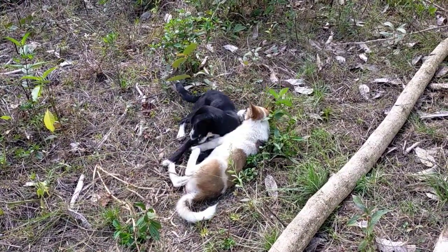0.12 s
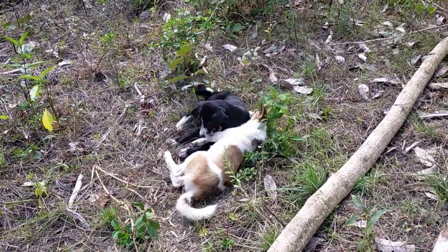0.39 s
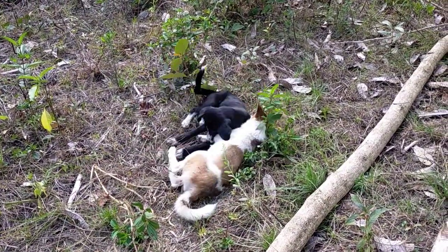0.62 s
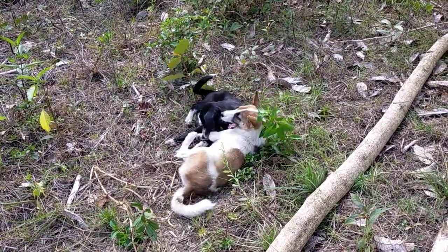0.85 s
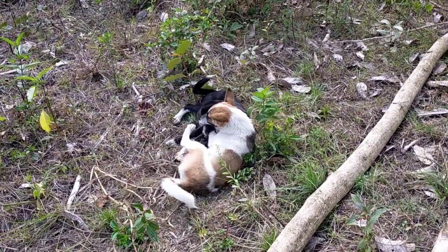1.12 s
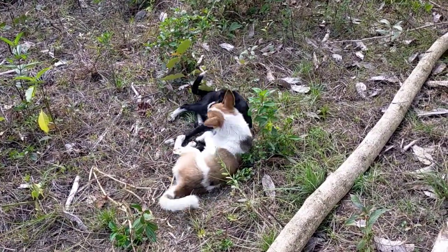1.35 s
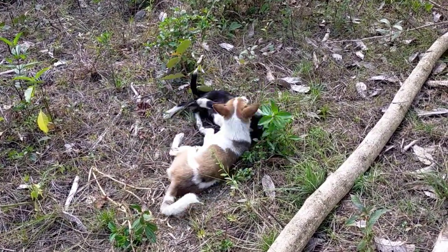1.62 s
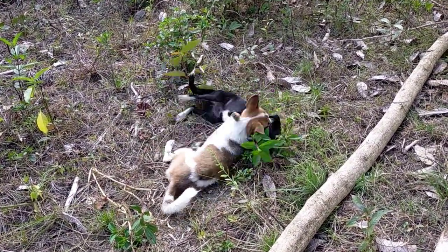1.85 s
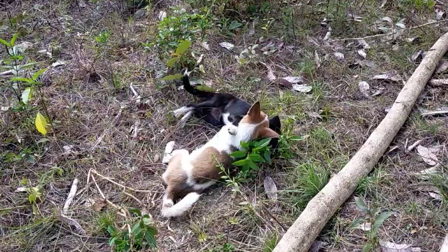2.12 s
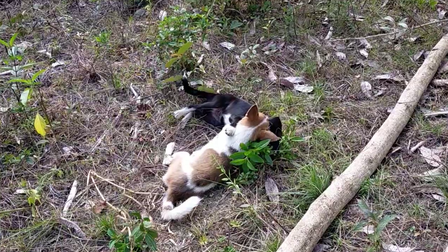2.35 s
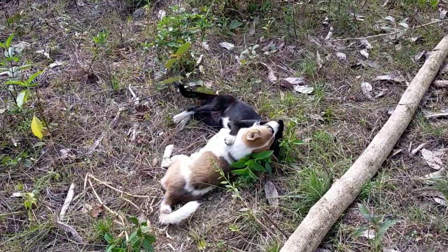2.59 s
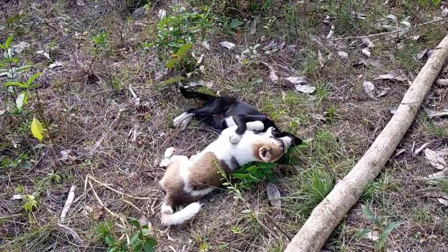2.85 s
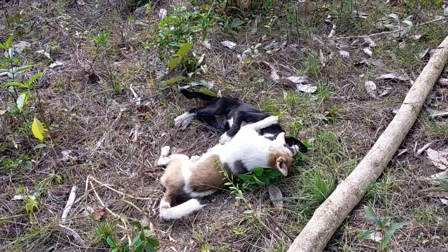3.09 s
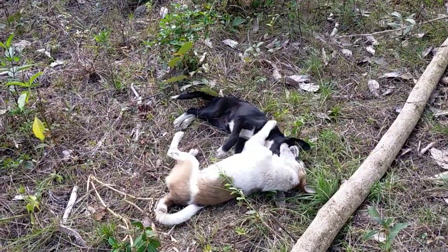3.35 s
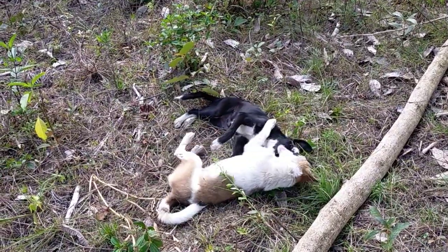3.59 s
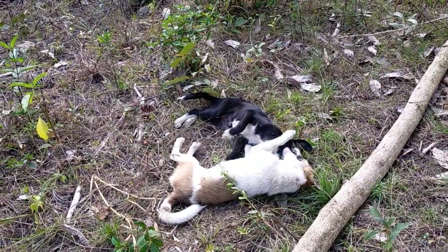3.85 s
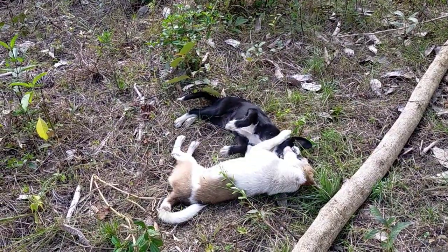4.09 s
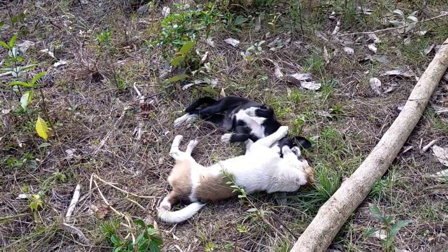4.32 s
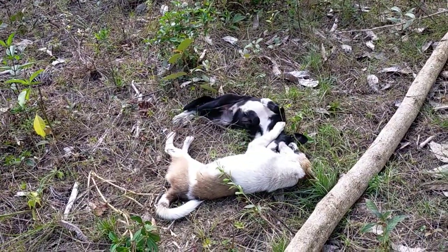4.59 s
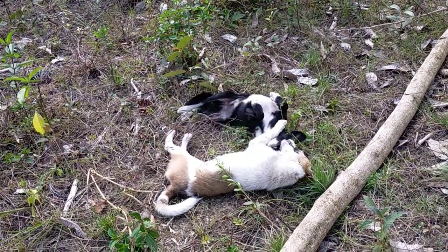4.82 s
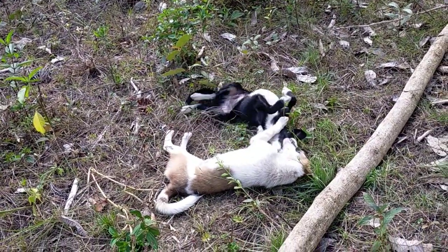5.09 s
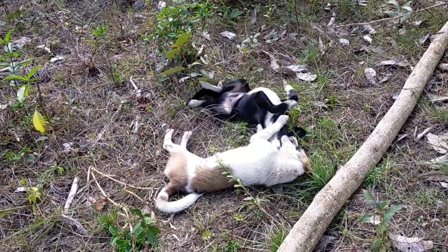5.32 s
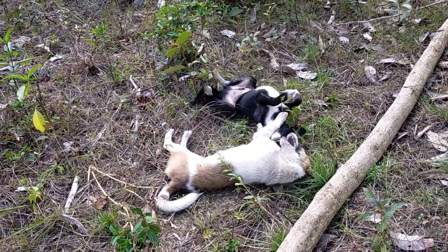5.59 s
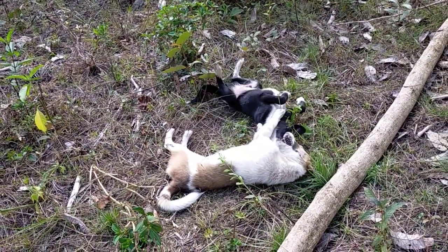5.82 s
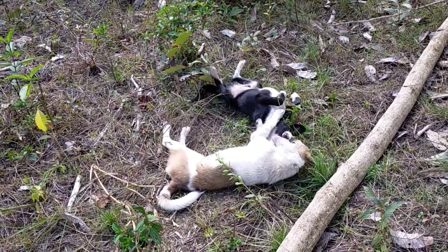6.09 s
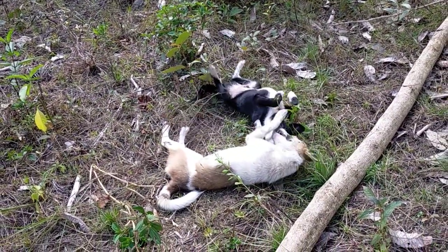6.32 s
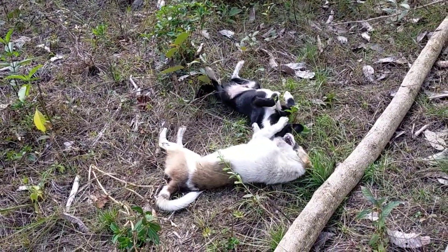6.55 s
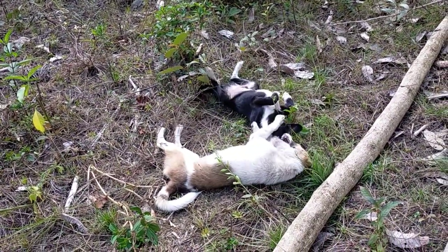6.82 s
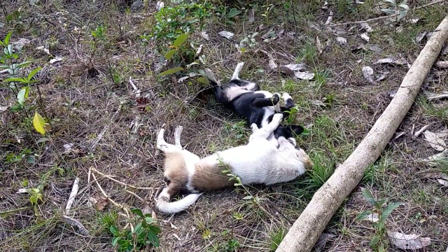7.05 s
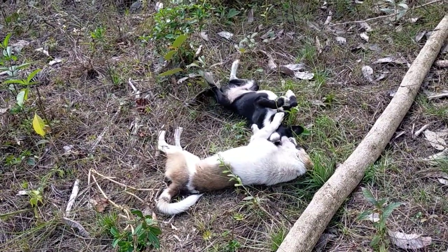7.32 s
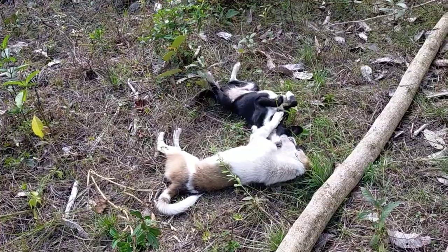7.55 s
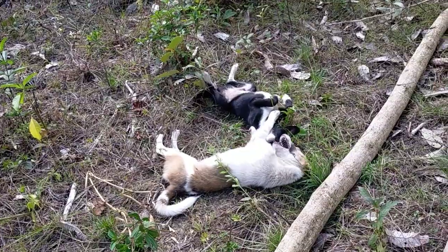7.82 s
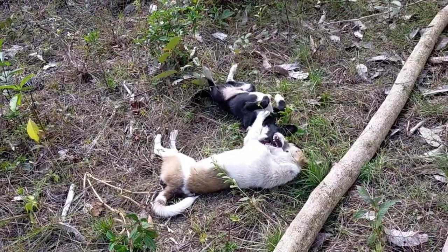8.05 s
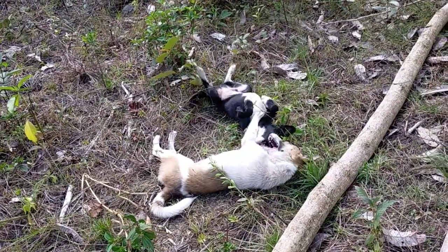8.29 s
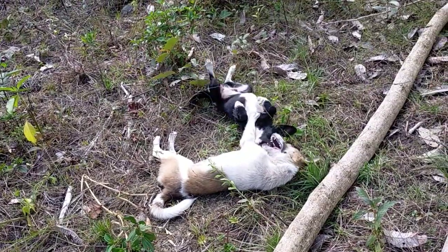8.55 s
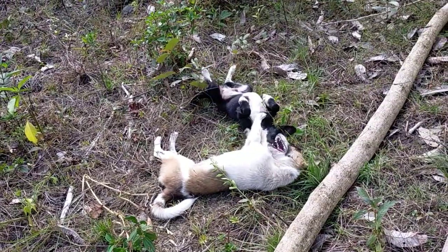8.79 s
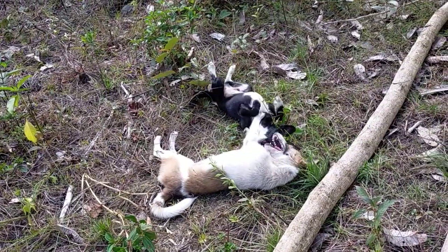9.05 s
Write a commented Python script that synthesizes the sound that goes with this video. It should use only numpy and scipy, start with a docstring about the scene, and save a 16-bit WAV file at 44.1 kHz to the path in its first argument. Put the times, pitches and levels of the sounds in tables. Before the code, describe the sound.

Two puppies roll and wrestle on dry grass and leaf litter a few metres from one microphone. Thin, bright rustles and tiny leaf ticks come and go, with small twig snaps and dull low thuds early on. A sharp, loud crunch lands past the middle, a double one follows later, and a smaller snap comes near the end. Faint distant hiss and high insect song stay underneath.

```python
"""Two puppies wrestle on dry grass and leaves, a few metres from one microphone.
Rustles, swishes and crunches of leaves shape a granular noise; single leaves tick in brief bursts.
Low thuds, likely the camera being handled, and twig snaps are sums of damped rings.
Insects sing as two narrow noise bands over a distant hiss, and low-frequency wind puffs
reach the microphone, one much stronger than the rest."""
import sys
import numpy as np
from scipy import signal
from scipy.fft import rfft, irfft
from scipy.io import wavfile
from scipy.ndimage import uniform_filter1d

SR = 44100
rng = np.random.default_rng(int(sys.argv[2]) if len(sys.argv) > 2 else 0)


def to_linear_factor(level_db):
    """Convert decibel levels (scalar or array-like) to linear amplitude factors."""
    exponent = np.asarray(level_db, float) / 20
    return 10 ** exponent


def master_out(mix):
    """Clip the mix to full scale and print it as 16-bit PCM to the path in sys.argv[1]."""
    frames = np.transpose(np.atleast_2d(mix))
    ceiling = np.clip(frames, -1, 1)
    pcm = np.round(ceiling * 32767).astype(np.int16)
    wavfile.write(sys.argv[1], SR, pcm)


N = 404397
T = np.arange(N) / SR  # time [s]

# spectrum of the duller leaf and twig noise: (frequency [Hz], relative level [dB])
DULL_SPECTRUM = [(300, -12), (700, 3), (1400, -1.5), (3000, -3.5), (4500, -11), (8000, -14)]
# how restless the dogs are in the grass: (time [s], mean rustle level [dB])
RESTLESSNESS = [(0, -62.5), (.3, -53), (.62, -59), (.9, -54.5), (1.2, -61), (1.45, -53.5), (1.9, -59.5),
                (2.35, -62.5), (2.8, -58), (3.2, -56), (3.6, -59.5), (4.15, -60), (4.5, -54), (4.9, -56),
                (5.45, -64), (5.65, -59), (6.8, -60), (7.05, -69), (7.6, -54), (8.05, -63), (8.45, -56),
                (8.85, -61), (9.17, -59)]


def unit(x):
    """Normalization: scale a signal to rms 1."""
    return x / np.sqrt(np.mean(x ** 2))


def colour(x, points):
    """Spectral shaping: (frequency [Hz], level [dB]) points joined over log frequency; rms 1."""
    hz, db = np.transpose(points)
    f = np.fft.rfftfreq(N, 1 / SR) + 1  # keeps the logarithm finite
    gain = to_linear_factor(np.interp(np.log(f), np.log(hz), db))
    return unit(irfft(rfft(x) * gain, N))


def walk(rate):
    """Slow random modulation: levels held 1 / rate seconds and smoothed twice; rms near 1."""
    hold = int(SR / rate)
    steps = np.repeat(rng.standard_normal(N // hold + 1), hold)
    smooth = uniform_filter1d(uniform_filter1d(steps, hold), hold)
    return unit(smooth[:N])


def add(out, s, piece):
    """Superposition: mix a piece in at a time in seconds."""
    i = int(s * SR)
    out[i:i + len(piece)] += piece[:N - i]


def ring(hz, t60, push_s):
    """Damped resonance: a mode swells during the push and decays 60 dB in t60 seconds."""
    t = T[:max(int(1.5 * t60 * SR), 256)]
    swelling = 1 - np.exp(-t / push_s)
    decay = np.exp(-np.log(1000) * t / t60)
    return np.sin(2 * np.pi * hz * t) * swelling * decay


def crackle(share, spread_db):
    """Granular noise: single-sample grains of uneven, bounded size scattered over steady noise."""
    size_db = np.minimum(spread_db * rng.exponential(size=N), 1.3 * spread_db)
    grains = (rng.random(N) < share) * to_linear_factor(size_db) * rng.standard_normal(N)
    return rng.standard_normal(N) + 0.96 * unit(grains)


def swell(rows, rise):
    """Energy addition: summed power of rounded bumps, each rising for a share of its length."""
    power = np.zeros(N)
    for s, db, length in rows:
        side_s = length * np.where(T < s, rise, 1 - rise)
        power += to_linear_factor(db) ** 2 * np.exp(-2 * ((T - s) / side_s) ** 2)
    return power


def leaves():
    """Friction noise: rustle, swishes and crunches share one crackle with a bright and a dull part."""
    # a limb or tail sweeping through stalks: (peak time [s], level [dB], length between 1/e points [s])
    sweeps = [(.28, -54, 0.18), (.5, -53, 0.055), (.73, -54, .04), (.91, -58, .1), (1.3, -57, .08),
              (1.69, -53, 0.088), (2.08, -59, .1), (2.18, -52, 0.034), (2.25, -56, .02), (2.35, -56, .03),
              (2.42, -59, .02), (2.46, -49, .015), (2.49, -56, .02), (3.01, -56, 0.073), (3.28, -52, .05),
              (3.38, -51, 0.065), (3.625, -49, .04), (3.76, -51.5, 0.09), (3.84, -49.5, 0.097),
              (3.92, -49, 0.087), (4.09, -50.5, 0.034), (4.16, -55, .03), (4.34, -56, 0.044),
              (4.46, -51, .06), (4.65, -44, 0.053), (5.73, -56, .04), (5.91, -56, .05), (6.17, -59, .02),
              (6.26, -47.5, .04), (6.345, -49, .05), (6.47, -56, .07), (6.946, -57, .02),
              (7.24, -51.5, 0.078), (7.36, -56.5, 0.037), (7.85, -55, .08), (8.06, -58, .02),
              (8.26, -59, 0.028), (8.61, -59, .02), (8.71, -58, .06), (8.77, -59, .03), (8.93, -59, .02)]
    # a paw or flank pressing leaves: (time [s], level [dB], dull part relative to bright [dB])
    presses = [(.3716, -45, -10), (1.8963, -55, 17), (1.92, -34, 0.5), (1.9375, -35, -17),
               (2.18, -42.5, 0.5), (2.3486, -38, -1), (2.5631, -42, 1), (3.269, -36, 0.5),
               (5.5144, -26.5, -16), (5.524, -27.5, -2), (5.5424, -37, -9), (6.996, -36, 0),
               (7.0399, -40, -10), (7.103, -25.5, -9), (7.1174, -42, 2), (7.149, -29, -4),
               (8.8243, -31.5, -4), (8.831, -31, -5), (8.8547, -32, -10)]
    # bright rustle as the microphone, peaking near 15 kHz, hears it: (frequency [Hz], relative level [dB])
    bright_spectrum = [(2650, -40), (4500, -24), (6000, -17), (6800, -12.5), (7800, -5), (10000, -22),
                       (12500, -10), (14800, 3), (15800, -4), (16300, -14)]
    patchy_db, flicker_db, dull_share_db = 2.5, 0.5, -16.5
    press_rise_s, press_fade_s = 0.00076, 0.016  # time constants

    bed = to_linear_factor(np.interp(T, *np.transpose(RESTLESSNESS)) + patchy_db * walk(9.5))
    bright = np.sqrt(bed ** 2 + swell(sweeps, rise=.45)) * to_linear_factor(flicker_db * walk(30))
    dull = bright * to_linear_factor(dull_share_db)
    t = T[:8000]
    for s, db, dull_db in presses:
        # crackle peaks stand well above its rms
        press = to_linear_factor(db - 11.5) * (1 - np.exp(-t / press_rise_s)) * np.exp(-t / press_fade_s)
        add(bright, s, press)
        add(dull, s, press * to_linear_factor(dull_db))
    grains = crackle(share=.04, spread_db=2.2)
    return bright * colour(grains, bright_spectrum) + dull * colour(grains, DULL_SPECTRUM)


def insects():
    """Incoherent summation: many far singers blur into rounded bands of noise."""
    # chorus bands: (centre frequency [Hz], width at half amplitude [Hz], mean level [dB rms])
    choruses = [(7875, 1100, -61.5), (11270, 1140, -70.5)]
    f = np.fft.rfftfreq(N, 1 / SR)
    out = np.zeros(N)
    for hz, width, db in choruses:
        offset = np.abs((f - hz) / width * 2)  # in half-widths
        band = irfft(rfft(rng.standard_normal(N)) / (1 + offset ** 3.6), N)
        out += to_linear_factor(db + 0.59 * walk(3.23)) * unit(band)
    return out


def air():
    """Broadband ambient noise: a smooth distant hiss that swells a little."""
    # hiss spectrum: (frequency [Hz], relative level [dB])
    hiss_spectrum = [(15, -7), (40, -16), (260, -11), (600, -13), (900, -10), (2000, -10.5), (2900, -13.5),
                     (3900, -20), (5300, -24.5), (7000, -23.5), (10000, -26.5), (12600, -26.5),
                     (14600, -27.5), (16000, -30)]
    level_db, swell_db = -56, .5
    hiss = colour(rng.standard_normal(N), hiss_spectrum)
    return to_linear_factor(level_db + swell_db * walk(1.31)) * hiss


def ticks():
    """Impulsive fracture: sub-millisecond leaf bursts excite the microphone's resonance near 15 kHz."""
    # the louder single leaves breaking: (time [s], level [dB], low edge [kHz])
    loud_leaves = [(.2947, -38, 7.6), (.371, -36, 7), (.7178, -38, 7), (1.075, -31.5, 8.5),
                   (1.5688, -34, 7), (1.6013, -38, 7), (1.6876, -35, 8.8), (1.9375, -30, 7),
                   (1.9714, -36, 7), (2.173, -39, 6), (2.3486, -36, 4), (2.363, -39, 5), (2.4558, -32, 9.2),
                   (2.5631, -38, 7), (2.5965, -35, 7), (3.0116, -33, 5.6), (3.3598, -28, 3.4),
                   (3.6032, -38, 7.6), (3.7604, -32, 9.8), (3.8277, -32, 9.9), (4.1619, -31.5, 4.5),
                   (4.3375, -35, 9.8), (4.6134, -33, 7), (4.6528, -28, 5.5), (4.669, -31, 4.2),
                   (4.9546, -36, 8), (5.5144, -31, 7), (6.2657, -30, 7.4), (6.339, -35, 7.6),
                   (6.3515, -32, 7.6), (6.3724, -31, 4.6), (6.995, -40, 6.5), (7.0399, -38, 6.4),
                   (7.1043, -24, 8.9), (7.1498, -35, 6.2), (7.4275, -36, 7), (8.8243, -37, 5.4),
                   (8.8315, -31, 5.2), (9.0813, -37, 4.3)]
    faint_count, faint_edge_khz = 24, 7.2
    faint_db, faint_spread_db = 18, 2.5  # over the mean rustle level, and spread either way
    rise_s, decay_s = 0.00022, 0.00068  # time constants

    out = np.zeros(N)
    when, size = rng.random((faint_count, 2)).T
    when = when * T[-512]
    rustle_db = np.interp(when, *np.transpose(RESTLESSNESS))
    levels_db = rustle_db + faint_db + faint_spread_db * (2 * size - 1)
    rows = list(loud_leaves) + [(s, db, faint_edge_khz) for s, db in zip(when, levels_db)]
    t = T[:256]
    envelope = (1 - np.exp(-t / rise_s)) * np.exp(-t / decay_s)
    microphone_ring = ring(14630, 0.011, .0002)[:256]
    for (s, db, khz), noise in zip(rows, rng.standard_normal((len(rows), 256))):
        edge_hz = np.clip(khz, 1, 15) * 1000
        high_pass = signal.butter(3, edge_hz, "high", fs=SR, output="sos")
        burst = signal.sosfilt(high_pass, noise * envelope)
        burst = burst / np.abs(burst).max()
        add(out, s + 0.00076, to_linear_factor(db) * (0.77 * burst + 0.66 * microphone_ring))
    return out


def thuds():
    """Modal excitation: low thuds, likely the camera being handled, add a main pitch to shared rings."""
    # low thuds: (time [s], level [dB], main pitch [Hz], upper shared rings relative level [dB])
    thud_rows = [(.371, -44, 304, -16), (.379, -37, 239, -21), (.424, -32, 288, -18),
                 (.555, -50.5, 288, -17), (1.901, -33, 265, -12), (1.924, -35.5, 208, -25),
                 (2.032, -50, 246, -17), (2.181, -37, 232, -15), (2.351, -39.5, 307, -17),
                 (2.375, -33, 296, -24), (2.415, -41, 283, -10), (2.434, -47, 333, -14),
                 (2.473, -43.5, 320, -14), (2.557, -44, 256, -15), (2.607, -47.5, 217, -17),
                 (2.769, -43, 247, -14.5), (2.799, -52, 256, -10), (3.274, -44.5, 261, -8.5),
                 (3.33, -51, 283, -10), (3.521, -45, 251, -15), (5.522, -23.5, 240, -11),
                 (5.549, -42, 220, -14), (6.998, -27.5, 230, -15.5), (7.03, -36, 218, -28),
                 (7.1, -27.5, 275, -18), (7.108, -31, 120, -25), (7.112, -32.5, 260, -9.5),
                 (7.14, -41, 237, -8), (7.16, -32.5, 254, -14), (7.209, -49, 212, -10),
                 (7.292, -50, 195, -14), (8.834, -44, 242, -7.5), (8.867, -42.5, 212, -13)]
    # shared low rings, deepest first: (frequency [Hz], relative level [dB], 60 dB decay time [s])
    shared_rings = [(211, 0, 0.21), (309, 0.5, 0.16), (378, 8.5, 0.077), (441, -5.5, 0.037),
                    (768, -8, 0.058)]
    main_t60_s, deep_ring_db = .075, -12

    out = np.zeros(N)
    for s, db, hz, upper_db in thud_rows:
        add(out, s, to_linear_factor(db) * ring(hz, main_t60_s, push_s=0.0013))
        for k, (ring_hz, ring_db, ring_t60) in enumerate(shared_rings):
            share_db = upper_db if k else deep_ring_db
            add(out, s, to_linear_factor(db + ring_db + share_db) * ring(ring_hz, ring_t60, push_s=0.0036))
    wavering = out * to_linear_factor(1.94 * walk(90))
    # the first swing is negative, and there is little deep bass
    high_pass = signal.butter(4, 178, "high", fs=SR, output="sos")
    return -signal.sosfilt(high_pass, wavering)


def snaps():
    """Brittle fracture: partial rings of unsteady level sound with short broad cracks."""
    # partial rings of snaps; a snap may have several rows at nearly the same time:
    # (time [s], level [dB], partial [Hz], crack relative level [dB])
    partials = [(.424, -41.5, 830, -20), (.69, -49, 1900, -10), (.705, -47, 2220, -8),
                (1.14, -47, 1600, -9), (1.897, -38, 2800, -8), (1.899, -35, 1360, -15),
                (1.900, -36, 846, -22), (1.900, -47, 3400, -20), (1.922, -38, 2840, -11),
                (2.040, -47, 1300, -5), (2.180, -42, 1180, -8), (2.186, -46, 3400, -15),
                (2.302, -44, 1440, -3.5), (2.314, -48, 1500, -8), (2.349, -42, 5900, -15),
                (2.350, -39, 1830, -5.5), (2.559, -43.5, 1400, -5), (3.269, -46, 1280, -1.5),
                (3.541, -49, 2840, -3.5), (3.548, -50, 4150, -12), (3.920, -49, 6390, -25),
                (4.091, -52, 5300, -25), (4.395, -56, 6100, -25), (4.61, -50, 6130, -23),
                (4.623, -47, 6000, -25), (4.653, -39.5, 6000, -25), (5.515, -38, 1770, -10),
                (5.515, -39, 3220, -17), (5.526, -31.5, 2820, -10), (5.527, -29.5, 3290, -20),
                (5.527, -35, 715, -20), (5.528, -36, 5860, -20), (5.531, -42, 1145, -11),
                (5.542, -38, 3700, -14), (6.699, -46, 2880, -10), (6.997, -42, 1040, -4),
                (7.102, -39, 2900, -13), (7.103, -39, 755, -15), (7.149, -43.5, 3500, -15),
                (7.150, -44, 1470, 1.5), (7.152, -35, 770, -17), (7.154, -40.5, 550, -20),
                (8.833, -33.5, 1290, -6.5), (8.836, -43, 490, -16), (8.845, -42, 1200, -7),
                (8.854, -40, 1370, -8.5), (8.866, -40, 6680, -20)]
    t60_at_1khz_s, damping = .046, 0.18  # ring time shrinks as pitch to the power of damping

    out = np.zeros(N)
    crack = colour(rng.standard_normal(N), DULL_SPECTRUM)
    for s, db, hz, crack_db in partials:
        t60 = t60_at_1khz_s * (1000 / hz) ** damping
        add(out, s, to_linear_factor(db) * ring(hz, t60, push_s=0.00055))
        fade = np.exp(-np.log(1000) * T[:2000] / (0.65 * t60))
        add(out, s, to_linear_factor(db + crack_db) * fade * crack[int(s * SR):][:2000])
    return out * (0.8 + 0.52 * walk(900))


def wind():
    """Turbulent pressure: slow puffs of low-frequency noise on the microphone port."""
    # (peak time [s], level [dB], length between 1/e points [s])
    gusts = [(4.58, -64, 0.33), (4.805, -52, 0.085), (5.04, -68, .1), (5.18, -64, .12)]
    spectrum = [(8, -1), (20, -2), (40, -14), (100, -43), (200, -90)]  # (frequency [Hz], level [dB])
    rumble = colour(rng.standard_normal(N), spectrum)
    return np.sqrt(swell(gusts, rise=.55)) * rumble


def scene():
    """Linear superposition at one microphone, the same in both channels."""
    mix = leaves() + insects() + air() + ticks() + thuds() + snaps() + wind()
    return np.tile(mix, (2, 1))


def low_pass(x):
    """Removes everything above the highest recorded frequency."""
    return signal.sosfilt(signal.butter(12, 16810, fs=SR, output="sos"), x)


def record(dry):
    """Band limitation: the recorder cuts sharply, by 46 dB, from 15780 Hz up."""
    gain = np.where(np.fft.rfftfreq(N, 1 / SR) < 15780, 1, to_linear_factor(-46))
    mix = irfft(rfft(dry) * gain, N)
    return low_pass(mix)


dry = scene()
out = record(dry)
master_out(out)
```